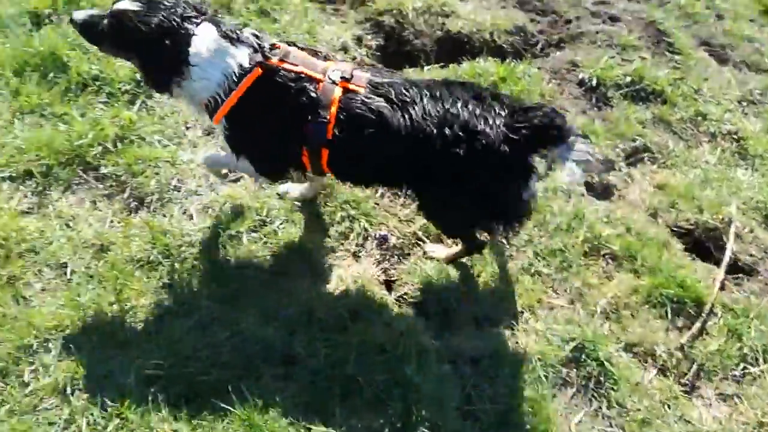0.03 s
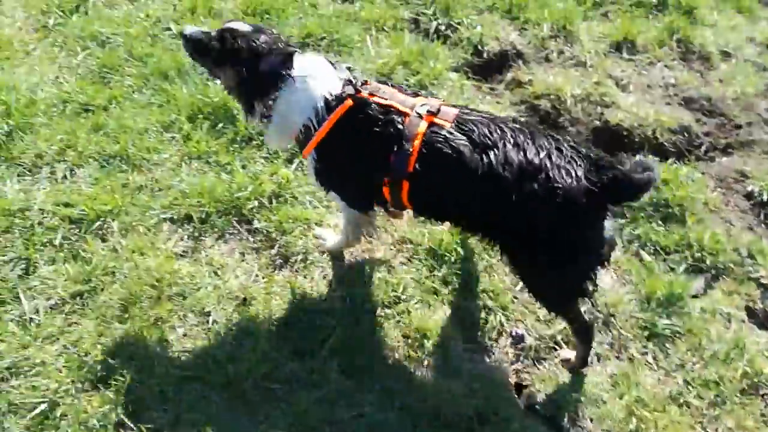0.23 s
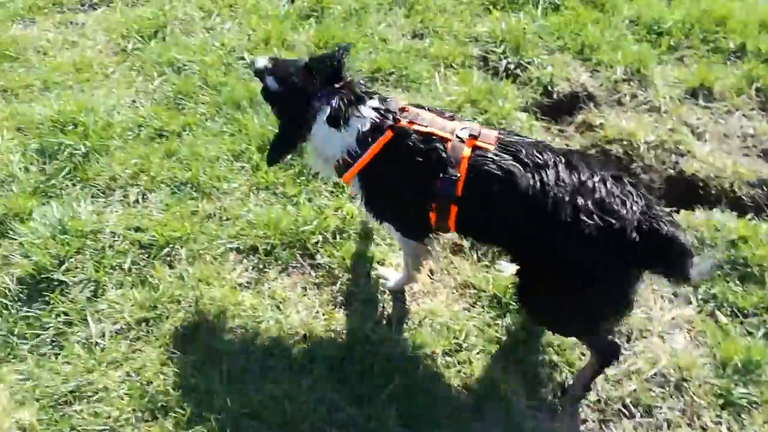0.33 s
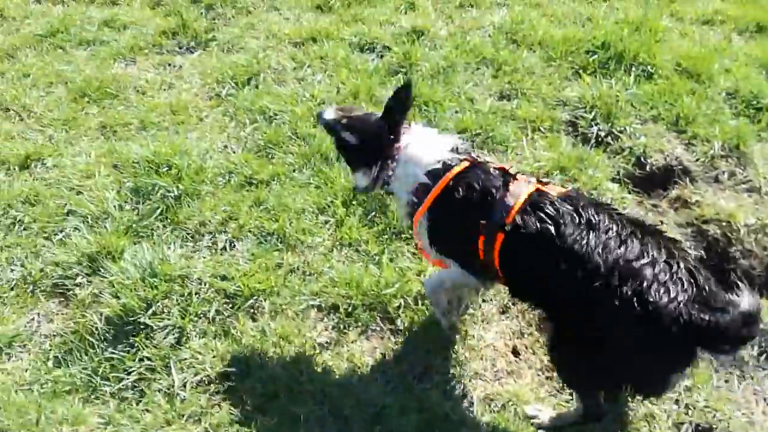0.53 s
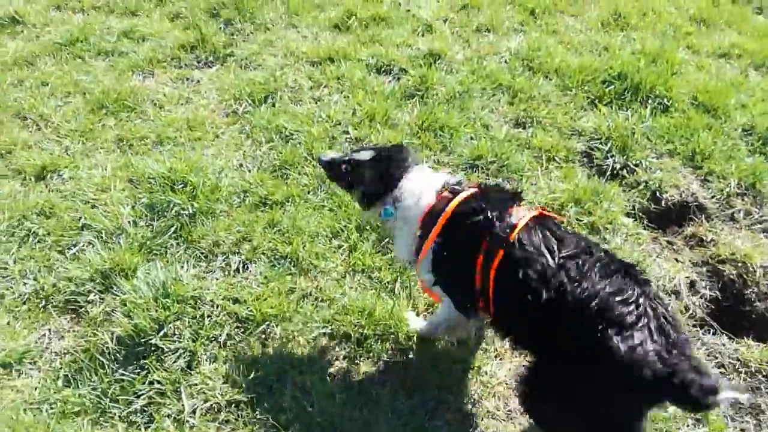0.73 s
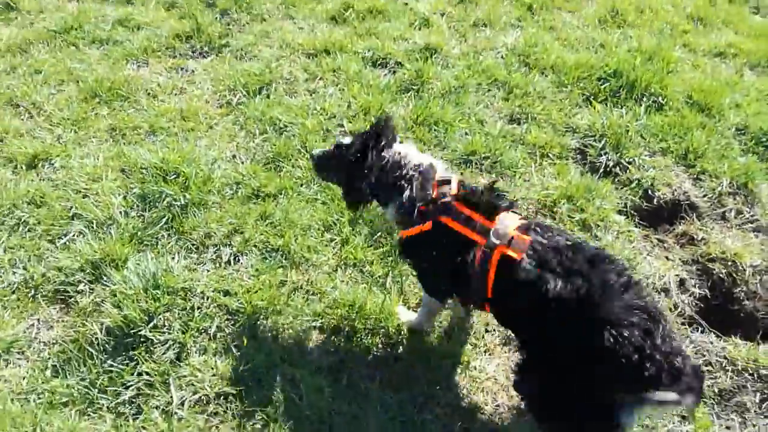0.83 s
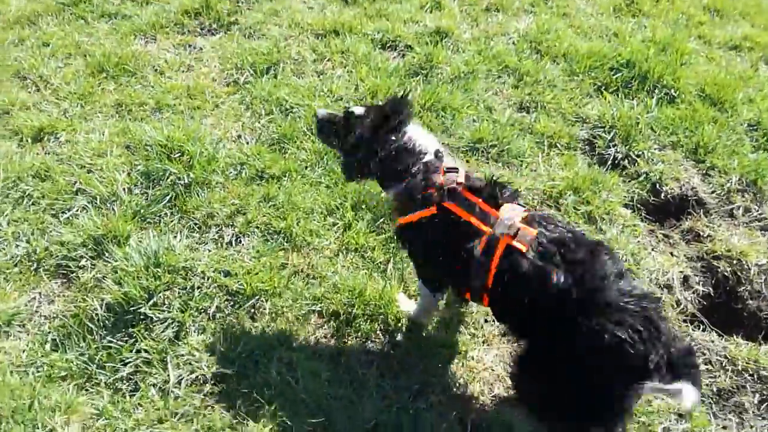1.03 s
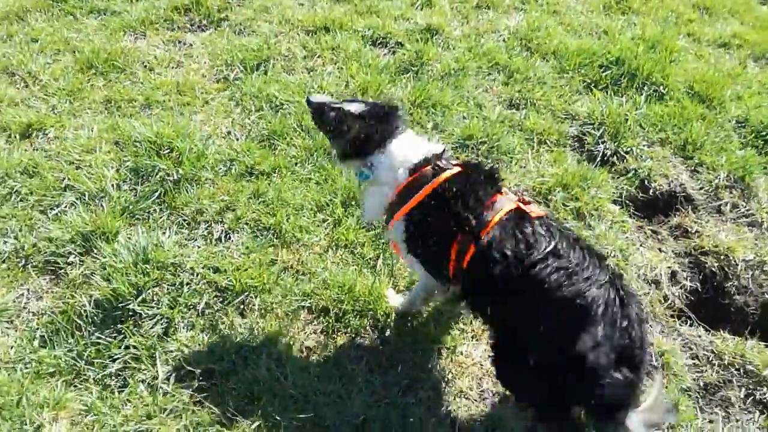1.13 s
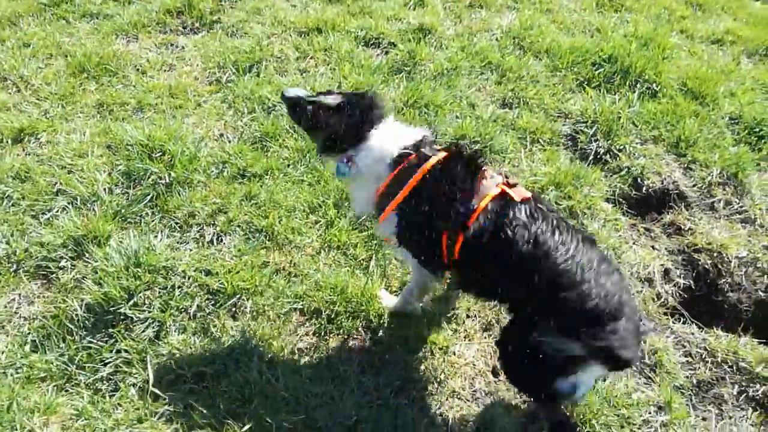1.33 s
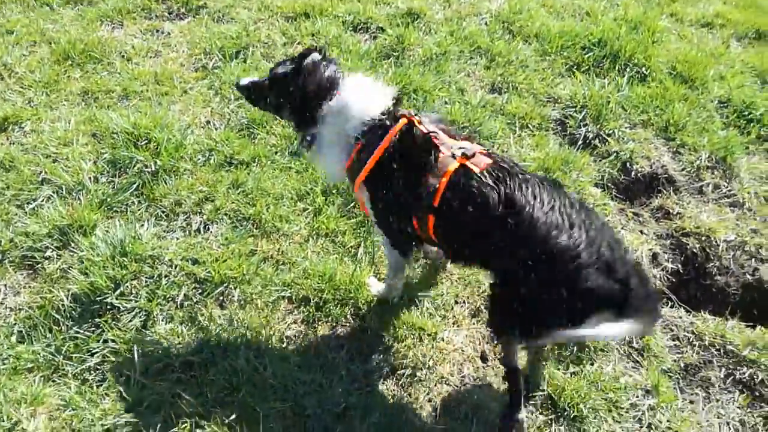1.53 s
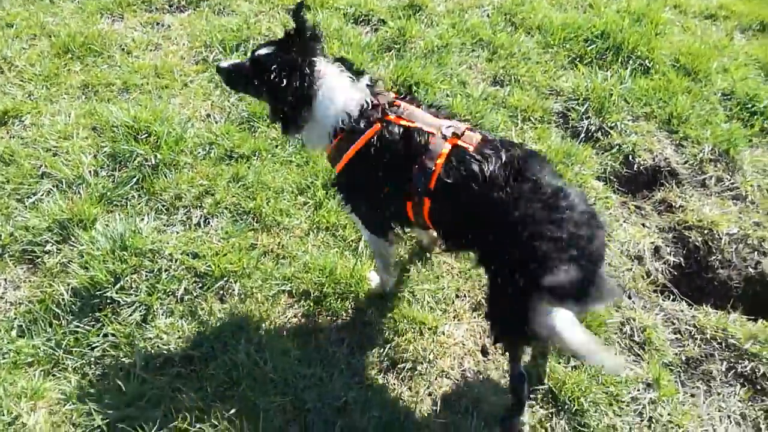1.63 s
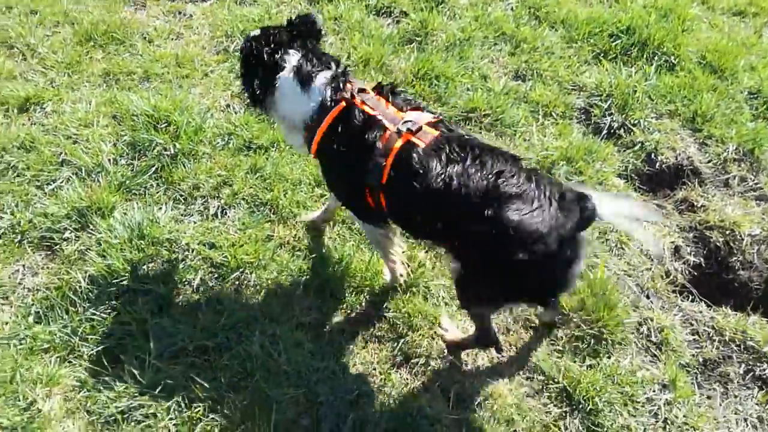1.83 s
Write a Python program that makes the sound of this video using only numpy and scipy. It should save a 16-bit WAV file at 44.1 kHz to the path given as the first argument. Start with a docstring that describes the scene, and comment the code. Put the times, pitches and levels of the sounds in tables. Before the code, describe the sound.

Metal harness buckles rattle rhythmically as a dog shakes, ears flapping and coat rustling.

```python
"""A dog shakes itself on a lawn, five twists a second, and the steel fittings of its harness clack and
rattle: each impact excites their damped modes. Its ears slap its head, friction makes the coat rustle
and the straps hiss, and a tag twice rings freely. A soft swish comes before the shake. Behind it all
are a low, slowly throbbing hum, like a far engine, a rumble and quiet outdoor air."""
import sys
import numpy as np
from scipy import signal
from scipy.fft import rfft, irfft, next_fast_len
from scipy.io import wavfile
from scipy.ndimage import map_coordinates

SR = 44100
rng = np.random.default_rng(int(sys.argv[2]) if len(sys.argv) > 2 else 0)


def master_out(mix):
    """Clip the mix to full scale and print it as 16-bit PCM to the path in sys.argv[1]."""
    frames = np.transpose(np.atleast_2d(mix))
    ceiling = np.clip(frames, -1, 1)
    pcm = np.round(ceiling * 32767).astype(np.int16)
    wavfile.write(sys.argv[1], SR, pcm)


N = 83790
TIME = np.arange(N) / SR
HALF_EACH_SIDE = np.array([[.5], [-.5]])  # splits a left-minus-right difference between the channels

def amp(db):
    return 10 ** (np.asarray(db) / 20)

def decay(t, t60):
    """Exponential damping: 1 until t = 0, then 60 dB down every t60 seconds."""
    return amp(-60 * np.maximum(t, 0) / t60)

def unit_rms(x):
    return x / np.sqrt(np.mean(x ** 2) + 1e-20)

def unit_hit(x):
    """Energy normalisation: the hit gets the energy of 3 ms at rms 1."""
    return x / np.sqrt(np.sum(x ** 2) / (.003 * SR) + 1e-20)

def at_hz(points, hz):
    """Interpolation of (frequency, value) points on a logarithmic axis."""
    frequencies, values = np.transpose(points)
    return np.interp(np.log(hz + 1), np.log(frequencies + 1), values)

def envelope(points):
    """Linear interpolation of (time, value) points at every sample."""
    return np.interp(TIME, *np.transpose(points))

def wobble(per_s):
    """Random modulation: a spline through per_s random knots a second."""
    return map_coordinates(rng.standard_normal(1000), [TIME * per_s], mode="wrap")

def filtered(x, response):
    """Linear filtering: the spectrum of x times a frequency response."""
    n = x.shape[-1]
    padded = next_fast_len(n + 4096)
    return irfft(rfft(x, padded) * response(np.fft.rfftfreq(padded, 1 / SR)), padded)[..., :n]

def coloured(x, spectrum):
    """Spectral shaping, normalised to rms 1."""
    return unit_rms(filtered(x, lambda hz: amp(at_hz(spectrum, hz))))

def stereo(mid, side, side_db):
    """Sum and difference: left and right from a common and an opposed part."""
    return unit_rms(np.array([mid + amp(side_db) * side, mid - amp(side_db) * side]))

def noise(spectrum, side_db):
    return coloured(stereo(*rng.standard_normal((2, N)), side_db), spectrum)

def place(out, start_s, x, pan_db):
    """Level panning: x enters the track with the left pan_db above the right."""
    part = out[:, round(start_s * SR):][:, :len(x)]
    part += amp(pan_db * HALF_EACH_SIDE) * x[:part.shape[1]]

# Throb of the hum (time [s], level [dB])
HUM_ENVELOPE = [(0, -62), (.13, -53), (.24, -42), (.45, -42.5), (.56, -46), (.66, -61.5), (.78, -52),
                (.95, -44), (1.08, -42), (1.2, -51), (1.33, -62.5), (1.48, -51.5), (1.62, -44.5),
                (1.78, -55.5), (1.9, -50)]
# Spectrum of the rumble (frequency [Hz], relative level [dB])
RUMBLE_SPECTRUM = [(15, -3), (35, -0.5), (80, 0.5), (140, -1), (185, -0.5), (230, -11), (310, -20),
                   (450, -31), (800, -44), (2000, -89)]
def distant_hum(hum_hz=101.7, drone_hz=127, rumble_share=.34):
    """Amplitude modulation: a tone throbs beside a weaker drone, and a rumble partly follows it."""
    hum_db = envelope(HUM_ENVELOPE)
    hum = amp(hum_db) * np.sin(2 * np.pi * hum_hz * TIME + .12 * wobble(4.94))
    drone = amp(-59 + 3 * wobble(4.4)) * np.sin(2 * np.pi * drone_hz * TIME + .15 * wobble(5.1))
    rumble_db = -51.5 + rumble_share * (hum_db - hum_db.mean()) + 1.2 * wobble(5.1)
    return np.sqrt(2) * (hum + drone) + amp(rumble_db) * noise(RUMBLE_SPECTRUM, side_db=-10.5)

# Spectrum of the outdoor air (frequency [Hz], relative level [dB])
AIR_SPECTRUM = [(200, 34), (500, 3), (1100, 18.5), (2000, -43), (3300, -11), (4500, -28.5), (6000, 17.5),
                (8000, -7.5), (16000, -7.5)]
def air():
    """Stationary noise: quiet outdoor air at a constant level."""
    return amp(-67) * noise(AIR_SPECTRUM, side_db=-5)

# Spectrum of the swish (frequency [Hz], relative level [dB])
SWISH_SPECTRUM = [(400, -22), (1100, -9), (1450, -9), (1900, -3.5), (2700, -15.5), (3400, -14), (4500, -26),
                  (6200, -22), (8000, -54)]
def swish(peak_s=.085, width_s=.079):
    """Band-limited noise under a Gaussian envelope: one soft, dull swish before the shake."""
    swell = np.exp(-((TIME - peak_s) / width_s) ** 2 / 2)
    return amp(-60.5) * swell * noise(SWISH_SPECTRUM, side_db=-1.5)

# Course of the coat's rustle (time [s], level [dB])
COAT_ENVELOPE = [(0, -80), (.3, -70), (.36, -66.5), (.47, -65.5), (.57, -59), (.68, -57.5), (.78, -58),
                 (.85, -59.5), (.96, -58.5), (1.06, -57.5), (1.17, -69), (1.36, -58), (1.5, -61),
                 (1.68, -63.5), (1.74, -66), (1.78, -61.5), (1.9, -63.5)]
# Spectrum of the rustle (frequency [Hz], relative level [dB])
COAT_SPECTRUM = [(300, -4), (700, -3), (1200, 2.5), (2200, 0), (3400, 1), (6000, -5), (9000, -8),
                 (12000, -12), (16000, -16.5)]
def coat(grains_per_s=710, swing_hz=9.93, swing_peak_s=.654, swing_db=1):
    """Friction: hair and straps rub in tiny grains, swelling with each swing to either side."""
    grains = (rng.random((2, N)) < grains_per_s / SR) * rng.choice([-1, 1], (2, N))
    grain_db = -.5 * np.minimum(rng.exponential(size=(2, N)), 4)
    crackle = coloured(stereo(*(grains * amp(grain_db)), side_db=0), COAT_SPECTRUM)
    rustle = unit_rms(noise(COAT_SPECTRUM, side_db=0) + amp(1.5) * crackle)
    swing = np.cos(2 * np.pi * swing_hz * (TIME - swing_peak_s))
    return rustle * amp(envelope(COAT_ENVELOPE) + swing_db * swing + 1.5 * wobble(60.1))

# Spectrum of the sliding straps (frequency [Hz], relative level [dB])
STRAP_SPECTRUM = [(500, -39), (2500, -2), (5000, 7), (7500, 3), (10000, 0), (16000, -4)]
def straps(peak_s=.315, rise_s=.004, t60=.24):
    """Sliding friction: webbing slips over the coat in one quick hiss as the shake begins."""
    t = TIME - peak_s
    rise = np.exp(np.minimum(t, 0) / rise_s)
    return amp(-54.5) * rise * decay(t, t60) * noise(STRAP_SPECTRUM, side_db=0)

# Modes of the steel fittings (frequency [Hz], relative level [dB], 60 dB decay time [s])
STEEL_MODES = [(1535, -19, 0.013), (1778, -21, 0.038), (2596, -18.5, 0.028), (3387, -8.5, 0.025),
               (4000, -10.5, 0.017), (5060, -2.5, 0.013), (5640, 2, 0.012), (6040, -7, 0.014),
               (7025, -1.5, 0.008), (8730, -3.5, 0.0086), (9500, -8.5, 0.01), (11300, -16, .005),
               (14300, -20, 0.0077), (15000, -30, 0.0063)]
def steel_ring(t, scatter_db=1.5, detune=.015):
    """Modal superposition: the steel's impulse response, quickly damped by straps and fur."""
    hz, db, t60 = np.transpose(STEEL_MODES)[:, :, None]
    gain, tuning, phase = rng.standard_normal((3, len(hz), 1))
    modes = np.sin(2 * np.pi * (hz * (1 + detune * tuning) * t + phase))
    return np.sum(amp(db + scatter_db * gain) * decay(t, t60) * modes, axis=0)

# Spectrum of the crack of contact (frequency [Hz], relative level [dB])
CRACK_SPECTRUM = [(300, -37), (900, -8.5), (1400, -11), (2200, -20), (3400, -2.5), (5600, -3), (8600, -2),
                  (10500, -13), (13500, -6.5), (16000, -12.5)]
def clack(chatter_s=.0024, jangle_t60=.031, crack_t60=.006):
    """Impact excitation: a chattering contact drives the steel's modes and gives a noisy crack."""
    t = np.arange(SR // 12) / SR
    ring = steel_ring(t)
    crack_noise, chatter_noise, jangle_noise = rng.standard_normal((3, len(t)))
    impulse = unit_hit(1. * (t == 0))
    chatter = amp(3) * unit_hit(chatter_noise * (t < chatter_s))
    jangle = amp(-9) * unit_hit(jangle_noise * decay(t, jangle_t60))
    force = unit_hit(impulse + chatter) + jangle
    ringing = unit_hit(signal.fftconvolve(force, ring)[:len(t)])
    crack = unit_hit(crack_noise * decay(t - chatter_s, crack_t60)) + jangle
    return ringing + amp(-3) * unit_hit(coloured(crack, CRACK_SPECTRUM))

# Contacts of the fittings (time [s], relative level [dB], left minus right [dB], relative treble [dB])
CONTACTS = [(0.3171, -46, 5.5, -18), (0.3204, -48.5, 9, -21), (0.3262, -48, 8, -31),
            (0.4888, -55.5, -3, -18), (0.5186, -34.5, 6, -11), (0.525, -31, 0, -4), (0.5274, -32, 4, -6),
            (0.6442, -52.5, 7, -5), (0.7073, -55.5, 3, 6), (0.719, -40, 3, -13), (0.725, -24, 7.5, -10.5),
            (0.732, -24, 1, -0.5), (0.7464, -37.5, 2, -2), (0.7756, -48, 3, 7), (0.8496, -48, 6.5, -27),
            (0.8614, -56, 3, -30), (0.9237, -35.5, 9, -14), (0.9293, -32, 5.5, 0), (0.9347, -25, 4, -9),
            (0.9575, -41, 4, -5), (1.0493, -53, 6, -37), (1.0604, -51, 7, -34), (1.1204, -34.5, 15.5, -14),
            (1.1265, -27, 8.5, -7), (1.1317, -28.5, -3.5, -2.5), (1.1414, -38, 2, 5),
            (1.1841, -49.5, -2, 0), (1.2513, -46, 4, -20), (1.321, -38, 4, -14), (1.3279, -24, 7, 0),
            (1.3323, -21.5, 2, -2.5), (1.3764, -67, 0, -17), (1.4283, -58, 5, -23), (1.45, -51.5, 3, -19),
            (1.529, -41.5, 10, -21), (1.537, -32, 5.5, -13), (1.5451, -42.5, 5, -11)]
# Further level difference between the sides (frequency [Hz], left minus right [dB])
FITTING_BALANCE = [(1200, -3), (2000, -4), (3300, -6), (4300, -1), (5500, 3), (7000, -1), (9000, -4),
                   (15000, -4)]
def fittings(bass_cut_hz=1250, crossover_hz=7500):
    """Radiation from small bodies: the fittings clack with almost no bass, some brighter than others."""
    out = np.zeros((2, N))
    bass_cut = signal.butter(4, bass_cut_hz, "high", fs=SR, output="sos")
    crossover = [signal.butter(4, crossover_hz, kind, fs=SR, output="sos") for kind in ("low", "high")]
    for start_s, level_db, pan_db, treble_db in CONTACTS:
        thin = signal.sosfilt(bass_cut, clack())
        mids, treble = [unit_hit(signal.sosfilt(band, thin)) for band in crossover]
        hit = unit_hit(mids + amp(treble_db + 2) * treble)
        place(out, start_s, amp(level_db + 1.5) * hit, pan_db)
    return filtered(out, lambda hz: amp(at_hz(FITTING_BALANCE, hz) * HALF_EACH_SIDE))

# Ear flaps (time [s], relative level [dB], pitch of the low pop or high buckle ring [Hz],
# that tone over the slap [dB], left minus right [dB])
EAR_FLAPS = [(0.5911, -47, 1150, -11.5, 3), (0.6992, -51.5, 1120, -3.5, -1), (0.8003, -35, 1233, 3, 1.5),
             (.9015, -49.5, 1040, -6, 1), (0.9996, -37.5, 3440, 3.5, 0.5), (1.102, -51, 1120, 1, 2),
             (1.2003, -36.5, 1620, -4.5, 1), (1.2994, -49.5, 1130, -6, 5.5), (1.3987, -39, 4150, -7, 1.5)]
# Spectrum of the slap (frequency [Hz], relative level [dB])
SLAP_SPECTRUM = [(200, 3), (600, -13.5), (1050, 3.5), (1700, 0), (2600, 0.5), (3700, 3), (5200, -2),
                 (7000, -8), (10000, -16), (16000, -23)]
def ears(brush_rise_s=.0022, slap_t60=.012, tone_rise_s=.0004, tone_t60=.013):
    """Damped impact: an ear brushes fur, then slaps with a hollow pop or a brief, bright buckle ring."""
    out, lead = np.zeros((2, N)), SR // 100
    t = np.arange(-lead, SR // 20) / SR
    after = np.maximum(t, 0)
    slap_shape = np.where(t < 0, amp(-11) * np.exp(-abs(t) / brush_rise_s), decay(t, slap_t60))
    tone_shape = (1 - np.exp(-after / tone_rise_s)) * decay(t, tone_t60)
    for impact_s, level_db, tone_hz, tone_db, pan_db in EAR_FLAPS:
        slap = unit_hit(coloured(slap_shape * rng.standard_normal(len(t)), SLAP_SPECTRUM))
        tone = unit_hit(tone_shape * np.sin(2 * np.pi * tone_hz * after))
        flap = unit_hit(slap + amp(tone_db) * tone)
        place(out, impact_s - lead / SR, amp(level_db + .5) * flap, pan_db)
    return out

# Pings of the tag (time [s], level [dB])
TAG_PINGS = [(.776, -45.5), (1.1855, -50)]
def tag(mode_hz=9400, t60=.064):
    """Free vibration: the tag swings clear and rings in one thin, high mode."""
    out, t = np.zeros((2, N)), np.arange(SR // 5) / SR
    ping = decay(t, t60) * np.sin(2 * np.pi * mode_hz * t)
    for start_s, level_db in TAG_PINGS:
        place(out, start_s, amp(level_db) * ping, pan_db=-2)
    return out

# Lead of the left microphone port over the right (frequency [Hz], phase [rad])
PORT_LEAD = [(100, 0), (1200, .8), (2500, 1.0), (5000, 1.1), (9000, 1.4), (16000, 1.55)]
def microphone_ports(x):
    """Phase difference: the left port leads the right, more so at high frequencies."""
    return filtered(x, lambda hz: np.exp(1j * at_hz(PORT_LEAD, hz) * HALF_EACH_SIDE))

def yard(x, t60=.1):
    """Diffuse scattering: the ground and surroundings return a faint, short tail."""
    t = np.arange(SR // 3) / SR
    tail = rng.standard_normal((2, len(t))) * decay(t, t60)
    return amp(-22) * signal.fftconvolve(x, tail / np.linalg.norm(tail[0]), axes=1)[:, :N]

def scene():
    """Superposition: the impacts and their scatter add to the rubbing sounds and the background."""
    impacts = microphone_ports(fittings() + ears() + tag())
    return impacts + yard(impacts) + coat() + straps() + swish() + distant_hum() + air()

def record(dry, cutoff_hz=16100):
    """Band limiting: a very steep low-pass removes the highest treble."""
    return filtered(dry, lambda hz: 1 / np.sqrt(1 + (hz / cutoff_hz) ** 160))

dry = scene()
out = record(dry)
master_out(out)
```